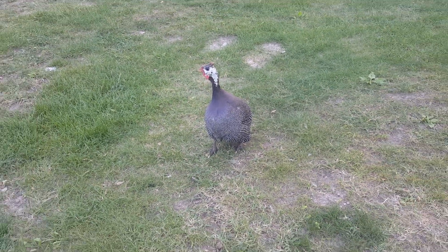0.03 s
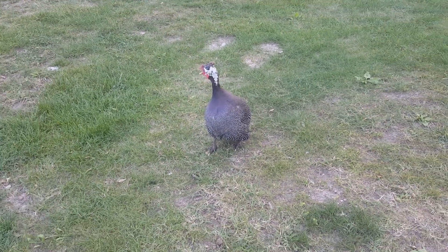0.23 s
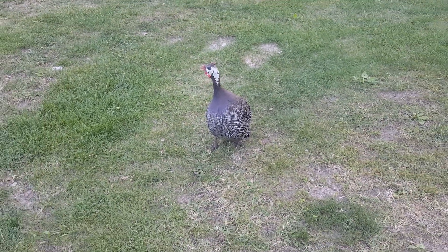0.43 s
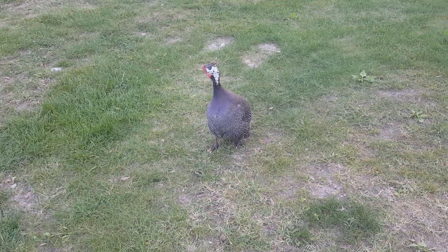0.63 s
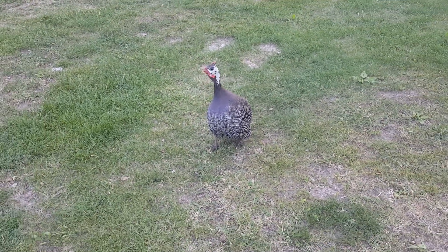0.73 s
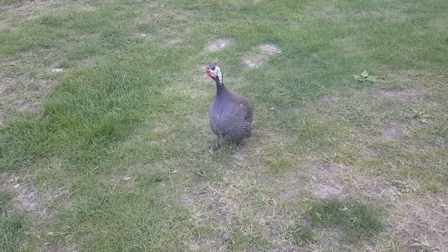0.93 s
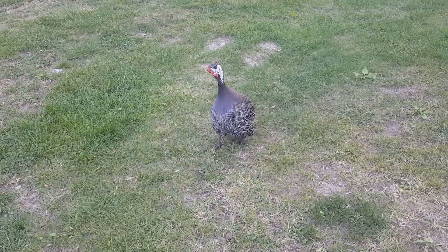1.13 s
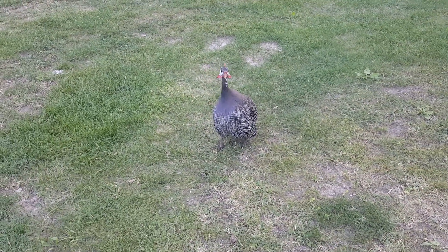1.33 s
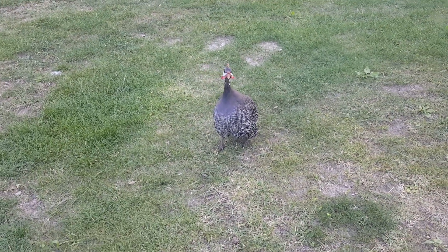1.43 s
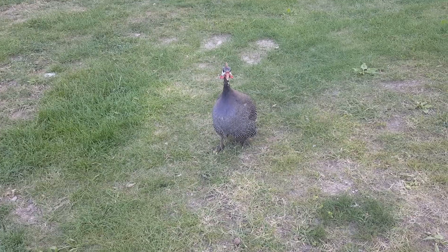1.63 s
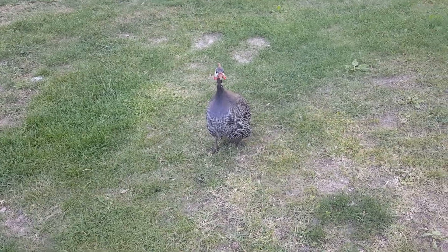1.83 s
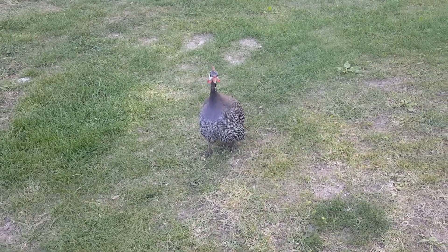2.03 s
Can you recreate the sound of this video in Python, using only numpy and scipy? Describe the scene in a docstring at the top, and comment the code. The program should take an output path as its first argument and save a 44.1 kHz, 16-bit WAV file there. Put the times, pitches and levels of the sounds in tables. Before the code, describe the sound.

A guinea fowl close by gives three harsh two-part calls outdoors. Soft croaks come at the very start, 0.7 and 1.5 seconds, each followed by a loud squeaky cry that breaks into a short rasp, at about 0.25, 1.0 and 1.75 seconds. A distant songbird twitters faintly between and after the cries. A steady low rumble runs underneath and swells slightly near the end, around two seconds.

```python
"""Over a steady low outdoor rumble, a guinea fowl on a lawn gives three two-part calls.
Each opens with a soft croak, puffs of air ringing the throat. Then comes the loud cry: a thin
whistle from the syrinx breaks into a two-voiced squeak, locks on to a clear note and falls apart
in a throbbing rasp. After each cry a small songbird is heard twittering farther off,
and towards the end the rumble swells a little."""
import sys
import numpy as np
from scipy import signal
from scipy.fft import rfft, irfft
from scipy.io import wavfile
from scipy.ndimage import uniform_filter1d

SR = 44100
rng = np.random.default_rng(int(sys.argv[2]) if len(sys.argv) > 2 else 0)


def transcribe(u):
    """Save the signal u as a 16-bit wav file named by the first command-line argument.

    u: samples, shape (n,) or (channels, n), limited to [-1, 1]; the rate is SR.
    q: integer samples, one column per channel.
    """
    v = np.clip(np.atleast_2d(u).T, -1, 1)
    q = np.round(v * 32767).astype(np.int16)
    wavfile.write(sys.argv[1], SR, q)


N = 92610
TIME = np.arange(N) / SR
FREQS = np.maximum(np.arange(N // 2 + 1) * SR / N, 1)


def from_db(db):
    """Decibels to gain."""
    return 10 ** (np.asarray(db) / 20)


def unit_rms(x):
    """Scale to unit rms."""
    return x / np.sqrt(np.mean(x ** 2) + 1e-20)


def per_hz(points):
    """Read a (f/Hz, value) curve at every frequency."""
    hz, value = np.transpose(points)
    return np.interp(np.log(FREQS), np.log(hz), value)


def band(x, hz, width_hz):
    """A resonance with steep skirts, at unit rms."""
    edges = np.clip([hz - width_hz / 2, hz + width_hz / 2], 20, .45 * SR)
    return unit_rms(signal.sosfilt(signal.butter(2, edges, "band", fs=SR, output="sos"), x))


def drift(rate_hz):
    """Random modulation at unit rms, rolling off around rate_hz."""
    return unit_rms(irfft(rfft(rng.standard_normal(N)) / (1 + (FREQS / rate_hz) ** 2) ** 2, N))


def tremolo(hz, depth, jitter, jitter_hz):
    """A gain that wobbles around 1 at an unsteady rate."""
    return 1 + depth * np.sin(2 * np.pi * np.cumsum(hz * (1 + jitter * drift(jitter_hz))) / SR)


def gate(start, length, attack, release):
    """Envelope with rounded attack, hold and release, in seconds."""
    edge = np.clip((TIME - start) / attack, 0, 1) * np.clip((start + length - TIME) / release, 0, 1)
    return np.sin(edge * np.pi / 2) ** 2


def tone(hz, harmonics_db):
    """Harmonics on a pitch curve, each at its rms level."""
    phase = 2 * np.pi * (np.cumsum(hz) / SR + rng.random())
    return np.sqrt(2) * sum(from_db(db) * np.sin(k * phase) for k, db in enumerate(harmonics_db, 1))


# tone colour of the ambience bed: f/Hz, relative level/dB
BED_SPECTRUM = [(15, -45), (25, -23), (53, -3), (96, 0.5), (240, -11), (289, -14), (349, -15), (495, -17.5),
                (782, -16.5), (1270, -18), (1410, -18.5), (1530, -18), (1950, -20.5), (4620, -30),
                (9050, -51), (15500, -56.5)]
# its stereo image: f/Hz, left-right correlation
BED_CORRELATION = [(60, 1), (150, 0.92), (380, 0.72), (950, -0.18), (2380, 0.058), (5980, 0.063),
                   (15000, -0.71)]
def outdoor_bed(level_db=-36):
    """Steady low rumble and soft hiss, centred in the bass and wide above."""
    mid, side = rfft(rng.standard_normal((2, N))) * from_db(per_hz(BED_SPECTRUM)) * (FREQS > 20)
    alike = np.clip(per_hz(BED_CORRELATION), -1, 1)
    stereo = np.sqrt(1 + alike) * mid + np.sqrt(1 - alike) * side * [[1], [-1]]
    return from_db(level_db) * unit_rms(irfft(stereo, N))


# fader ride on the low mids: t/s, level/dB
SWELL_LEVEL = [(0, -65), (1.6, -53), (1.85, -43), (2.1, -46.5)]
def low_swell():
    """The low mids of the rumble swell a little."""
    gain = from_db(np.interp(TIME, *np.transpose(SWELL_LEVEL)))
    return gain * band(rng.standard_normal(N), hz=260, width_hz=214)


def yard_reverb(x, t60_s=0.28, cutoff_hz=6300):
    """Dull scattered echoes from the surroundings, different left and right."""
    tail = rng.standard_normal((2, N)) * from_db(-60 * TIME / t60_s) * np.clip(TIME / 0.008, 0, 1)
    tail /= np.sqrt(np.sum(tail ** 2) / 2)
    tail = signal.sosfilt(signal.butter(2, cutoff_hz, fs=SR, output="sos"), tail)
    return signal.fftconvolve(x[None], tail, axes=1)[:, :N]


# songbird syllables: t/s, length/s, start f/Hz, middle f/Hz, end f/Hz, level/dB
SYLLABLES = [(0.4, 0.027, 4480, 5540, 4520, -51.5), (0.426, 0.017, 4550, 4380, 4240, -49.5),
             (0.49, 0.024, 3650, 4860, 3700, -49), (0.811, 0.012, 4073, 4400, 4900, -47),
             (0.819, 0.0052, 4950, 4600, 3550, -42), (0.828, 0.0069, 3680, 4280, 3700, -41.5),
             (0.844, 0.029, 3320, 3310, 3050, -47), (.865, 0.022, 2890, 2690, 2550, -53),
             (1.207, 0.031, 4520, 4910, 5500, -50), (1.229, 0.034, 4800, 3864, 3430, -45.5),
             (1.22, 0.043, 1666, 1677, 1690, -44.5), (1.259, 0.017, 1067, 1026, 990, -45.5),
             (1.261, 0.026, 2020, 1997, 2040, -50), (1.274, 0.031, 3250, 3650, 4200, -43.5),
             (1.311, 0.012, 3710, 3240, 3150, -46.5), (1.62, 0.032, 4650, 4230, 3520, -50),
             (1.646, 0.012, 4360, 4140, 3450, -41.5), (1.681, 0.0086, 3570, 3590, 3080, -40.5),
             (1.689, 0.019, 3460, 3310, 3550, -49), (1.967, 0.024, 3710, 4370, 4300, -50),
             (1.985, .075, 3915, 3076, 2480, -44)]
def songbird(flicker_db=2):
    """Quick flickering whistles, each gliding through three pitches."""
    out, waver = 0, 1 + .012 * drift(285)
    for start, length, first_hz, middle_hz, last_hz, db in SYLLABLES:
        u = 2 * np.clip((TIME - start) / length, 0, 1) - 1  # -1 to 1 across the syllable
        hz = middle_hz + u * (last_hz - first_hz) / 2 + u ** 2 * ((first_hz + last_hz) / 2 - middle_hz)
        out += gate(start, length, 0.067 * length, 0.16 * length) * tone(hz * waver, [db])
    return out * from_db(flicker_db * drift(146.4))


# the fowl's pan: f/Hz, left minus right level/dB
FOWL_PAN = [(1100, 1), (1550, 3.5), (3100, 2.2), (4700, 0), (8000, 4.5), (12000, -4.5)]
# its phase offset: f/Hz, left lead/rad
FOWL_LEAD = [(1100, 0.63), (1550, 0.52), (4700, 0.53), (8000, 1.4), (12000, 1.1)]
def pan_fowl(x, half_taps=128):
    """The fowl arrives left and right with small differences in level and phase."""
    left = from_db(per_hz(FOWL_PAN) / 2) * np.exp(.5j * per_hz(FOWL_LEAD))
    responses = np.roll(irfft(np.array([left, 1 / left]), N), half_taps, axis=1)
    responses = responses[:, :2 * half_taps + 1] * np.hanning(2 * half_taps + 1)
    return np.array([np.convolve(x, response, "same") for response in responses])


# the fowl turns its head towards the listener: t/s, treble level/dB
HEAD_TURN = [(.3, -7), (1.0, -2.5), (1.5, 12.5), (1.8, 6)]
def beak_beam(x, above_hz=6560):
    """The treble leaves the beak in a beam, so the call brightens as the bird faces us."""
    treble = signal.sosfiltfilt(signal.butter(2, above_hz, "high", fs=SR, output="sos"), x)
    gain = from_db(np.interp(TIME, *np.transpose(HEAD_TURN)))
    return x + (gain - 1) * treble


# peeps leading into the later croaks: t/s, length/s, level/dB, relative octave level/dB
CROAK_PEEPS = [(0.718, 0.026, -39, -7), (1.473, 0.022, -45, -1)]
# whistles leading into the cries: t/s, length/s, level/dB
CRY_WHISTLES = [(0.216, .028, -43), (.926, 0.038, -49.5), (1.714, 0.016, -42.5)]
# their harmonics, from the first up: relative level/dB
WHISTLE_TIMBRE = [1.5, -18, -29, -28.5]
def whistles(croak_hz=2540, cry_hz=3540):
    """The syrinx first sounds a faint steady whistle, lower before a croak than before a cry."""
    waver = 1 + 0.0083 * drift(250)
    envelope = sum(from_db(db) * gate(start, length, 0.0048, 0.0017)
                   for start, length, db in CRY_WHISTLES)
    out = envelope * tone(cry_hz * waver, WHISTLE_TIMBRE)
    for start, length, db, octave_db in CROAK_PEEPS:
        out += from_db(db) * gate(start, length, 0.004, 0.0036) * tone(croak_hz * waver, [0, octave_db])
    return out


def hoarse_voice(formants, tilt_db, pulse_hz=560, jitter=.2, breath=0.42, pivot_hz=1562):
    """Uneven pulses and puffs of air ring the throat, tilted by tilt_db per two octaves."""
    cycles = np.cumsum(pulse_hz * (1 + jitter * drift(500))) / SR
    pulses = unit_rms(np.diff(np.floor(cycles), prepend=0))
    puffs = breath * rng.standard_normal(N) * (1 + np.cos(2 * np.pi * cycles))
    voice = sum(from_db(db + tilt_db * np.log2(hz / pivot_hz) / 2) * band(pulses + puffs, hz, width)
                for hz, width, db in formants)
    return voice / np.sqrt(uniform_filter1d(voice ** 2, size=500) + 1e-9)  # evens out the level


# soft croaks: t/s, length/s, level/dB, tilt/dB per two octaves
CROAK_CUES = [(-.01, 0.0486, -37, 0), (0.735, 0.041, -35, -1), (1.489, 0.038, -34.5, -4.5)]
# throat resonances in a croak: f/Hz, width/Hz, relative level/dB
CROAK_FORMANTS = [(1042, 89, -11.5), (1303, 48, -1.5), (1670, 240, -7), (2420, 620, -11.5),
                  (3065, 340, -14), (4694, 230, -10.5), (5580, 700, -14), (11400, 520, -33.5),
                  (14200, 1200, -37)]
def croaks(peak_hz=1573, arch_hz=105.3, harmonics_db=(-15, -12.5, -14.5, -26.5)):
    """The soft first part of each call: a hoarse puff with a weak, arched voice in it."""
    out = 0
    for start, length, db, tilt_db in CROAK_CUES:
        u = 2 * np.clip((TIME - start) / length, 0, 1) - 1
        hz = (peak_hz - arch_hz * u ** 2) * (1 + 0.0084 * drift(600))
        voice = tone(hz, harmonics_db) + hoarse_voice(CROAK_FORMANTS, tilt_db)
        out += from_db(db) * gate(start, length, 0.01, 0.011) * voice
    return out


# chokes ending the first two rasps: t/s, level/dB
CHOKE_CUES = [(0.356, -38), (1.077, -40)]
def chokes(length=0.013, glide_hz=(3240, 2770)):
    """A tiny falling squeak as the throat closes on the rasp."""
    out = 0
    for start, db in CHOKE_CUES:
        hz = np.interp(TIME, [start, start + length], glide_hz)
        out += gate(start, length, .003, 0.0088) * tone(hz, [db])
    return out


# rasps: t/s, length/s, midway level/dB, tilt/dB per two octaves
RASP_CUES = [(0.306, 0.062, -24, 0), (1.02, 0.073, -23.5, 1.5), (1.767, 0.097, -22, 0)]
# throat resonances in a rasp: f/Hz, width/Hz, relative level/dB
RASP_FORMANTS = [(1105, 45, -9), (1566, 107, 5), (1670, 210, -0.5), (2354, 424, -8.5), (3040, 340, -13.5),
                 (4700, 400, -6), (5140, 400, -9.5), (5670, 216, -17.5), (8400, 1000, -42),
                 (12100, 610, -36), (14200, 810, -46)]
def rasps(fade_db_per_s=71.5, flicker_db=1.0):
    """The cry's tail: the note breaks up into a throbbing, fading rasp."""
    out = 0
    for start, length, db, tilt_db in RASP_CUES:
        throb = tremolo(hz=82.37, depth=0.15, jitter=.15, jitter_hz=60)
        fade_db = -fade_db_per_s * (np.clip(TIME - start, 0, length) - length / 2)
        envelope = from_db(db + fade_db) * gate(start, length, 0.017, .014)
        out += envelope * throb * hoarse_voice(RASP_FORMANTS, tilt_db)
    return out * from_db(flicker_db * drift(250))


# throat resonances in the breath: f/Hz, width/Hz, level/dB
BREATH_FORMANTS = [(1590, 770, -41), (2436, 260, -50), (4690, 640, -37), (5730, 690, -45.5),
                   (8580, 960, -60.5), (11400, 680, -64), (14200, 700, -73.5)]
def breath_hiss():
    """Air rushing through the throat, layered under the squeak and the note."""
    air = rng.standard_normal(N)
    return sum(from_db(db) * band(air, hz, width) for hz, width, db in BREATH_FORMANTS)


# upper voice of the squeak: t/s, length/s, swell/s, level/dB
UPPER_CUES = [(0.23, 0.0227, 0.014, -15), (0.949, 0.047, 0.031, -12.5), (1.721, .023, .012, -19)]
# its harmonics, from the first up: relative level/dB
UPPER_TIMBRE = [-7.5, -35, -22.5]
def upper_voice(start_hz=1745, end_hz=1654, chirp_fall_hz_per_s=7000, chirp_db=-17):
    """One side of the syrinx swells and sags in pitch, with a falling chirp on the attack."""
    out = 0
    for start, length, swell, db in UPPER_CUES:
        hz = np.interp(TIME, [start, start + length], [start_hz, end_hz]) * (1 + 0.0039 * drift(400))
        body = gate(start - .005, length + 0.0037, swell + 0.0096, 0.0035) * tone(hz, UPPER_TIMBRE)
        # only the third harmonic of this faster fall sounds
        sinking_hz = start_hz - chirp_fall_hz_per_s * (np.clip(TIME - start, 0, swell) - swell / 2)
        chirp = gate(start - .002, swell + 0.0032, swell, 0.009) * tone(3 * sinking_hz, [chirp_db])
        out += from_db(db) * (body + chirp)
    return out


# lower voice: t/s, length/s, third harmonic level/dB, first and second harmonic against it/dB
LOWER_CUES = [(0.2433, 0.011, -20.5, 1, -11.5), (0.969, 0.03, -21.5, -12, -16.5),
              (1.730, 0.013, -25, -2.5, -14), (1.741, 0.0216, -35.5, 11, -2.5)]
# its harmonics 5, 7 and 9 against the third: level/dB
LOWER_ODD_TIMBRE = [-28, -44, -53.5]
def lower_voice(pitch_hz=1562, undertone_hz=1403, undertone_db=-8.5):
    """The other side of the syrinx holds a lower, breathy pitch with an undertone."""
    out, air = 0, breath_hiss()
    for start, length, db, first_db, second_db in LOWER_CUES:
        waver = 1 + 0.0052 * drift(850)
        hz = pitch_hz * waver
        odd_db = [first_db, 0, *LOWER_ODD_TIMBRE]
        odd = sum(tone((2 * k + 1) * hz, [level]) for k, level in enumerate(odd_db))
        even = tone(2 * hz, [second_db, second_db - 10.5])
        undertone = tone(undertone_hz * waver, [undertone_db])
        out += gate(start, length, .0035, .004) * (from_db(db) * (odd + even + undertone) + air)
    return out


def squeaks():
    """The two sides of the syrinx sound at different pitches, fluttering, before they lock."""
    flutter = tremolo(hz=279.3, depth=0.12, jitter=.05, jitter_hz=100)
    return (upper_voice() + lower_voice()) * flutter


# clear notes: t/s, length/s, lowest f/Hz, t/s of that low point, level/dB, attack/s
NOTE_CUES = [(0.251, 0.0743, 1504, 0.27, -11, 0.0086), (0.9936, 0.047, 1523, 1.007, -10, 0.0069),
             (1.7566, 0.026, 1532, 1.768, -9.5, 0.0086)]
# their harmonics, from the first up: relative level/dB
NOTE_TIMBRE = [-0.5, -25, -14.5, -54.5, -38.5, -51.5, -62, -69, -64]
def clear_notes(settle_hz_per_s=2300, rise_hz_per_s=1500, breath_db=5.5):
    """The syrinx locks on to one loud note: its pitch settles, then climbs steadily."""
    out, air = 0, from_db(breath_db) * breath_hiss()
    for start, length, low_hz, turn, db, attack in NOTE_CUES:
        since_turn = np.clip(TIME, start, start + length) - turn
        bend_hz = np.maximum(-settle_hz_per_s * since_turn, rise_hz_per_s * since_turn)
        hz = (low_hz + bend_hz) * (1 + 0.0035 * drift(860))
        out += from_db(db) * gate(start, length, attack, 0.016) * (tone(hz, NOTE_TIMBRE) + air)
    return out * (1 + 0.0087 * drift(300))


def voice_catch(dip_db=-8.5, width_s=0.0032):
    """The voice catches as each clear note takes over: a gain that ducks the squeak."""
    return from_db(dip_db * sum(np.exp(-((TIME - start) / width_s) ** 2) for start, *_ in NOTE_CUES))


def scene(echo_s=.108, echo_db=-39, fowl_send_db=-23, song_send_db=-0.5):
    """The mix: the fowl close and nearly dry with one faint echo, the songbird far and wet, the bed."""
    fowl = whistles() + croaks() + squeaks() * voice_catch() + clear_notes() + rasps() + chokes()
    echo = from_db(echo_db) * np.interp(TIME - echo_s, TIME, fowl, left=0)
    song = songbird()
    reverb = yard_reverb(from_db(fowl_send_db) * fowl + from_db(song_send_db) * song)
    return outdoor_bed() + low_swell() + reverb + song + echo + pan_fowl(beak_beam(fowl))


def record(dry, fade_s=.006, cutoff_hz=15800):
    """Master: short fades at both ends and a steep high cut."""
    faded = dry * gate(0, N / SR, fade_s, fade_s)
    return signal.sosfilt(signal.ellip(12, .1, 80, cutoff_hz, fs=SR, output="sos"), faded)


dry = scene()
out = record(dry)
transcribe(out)
```